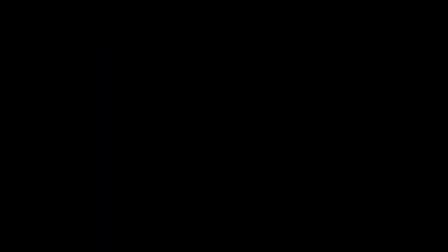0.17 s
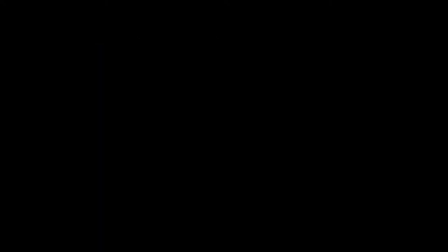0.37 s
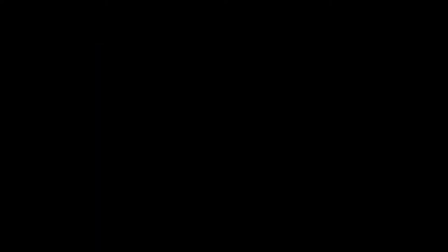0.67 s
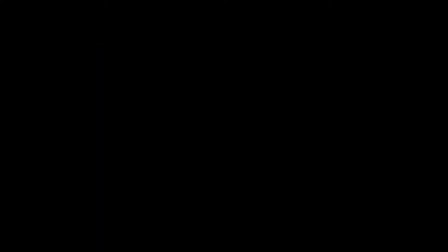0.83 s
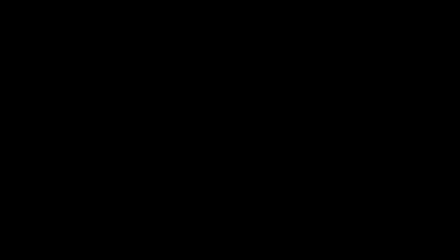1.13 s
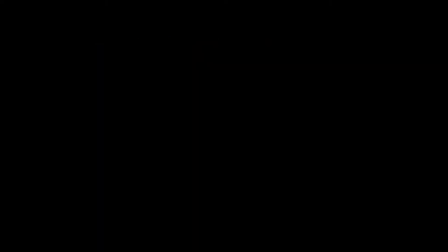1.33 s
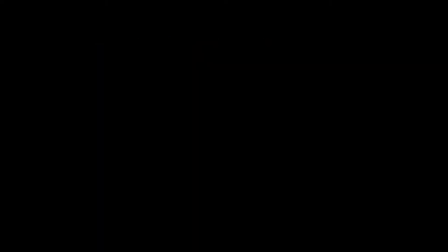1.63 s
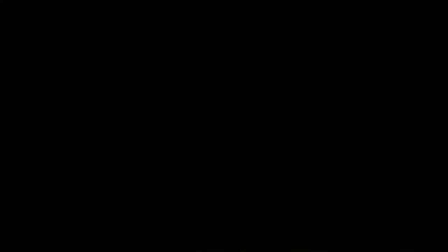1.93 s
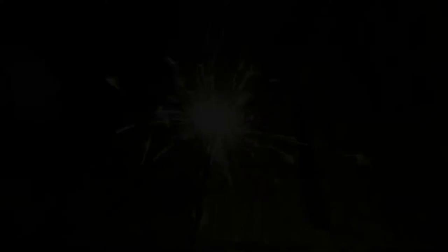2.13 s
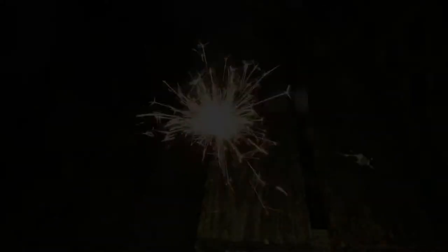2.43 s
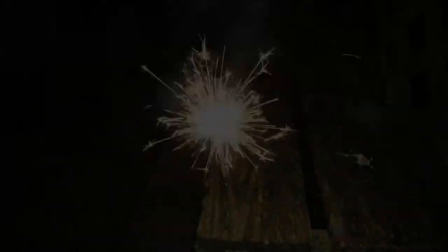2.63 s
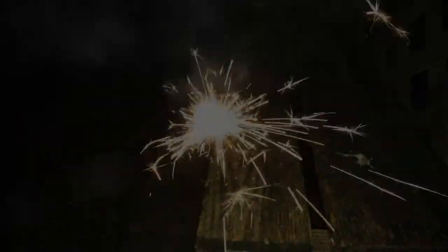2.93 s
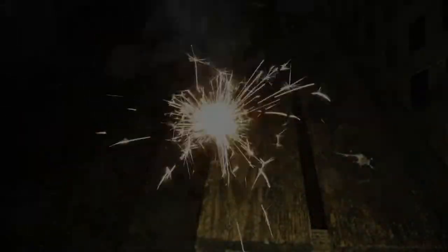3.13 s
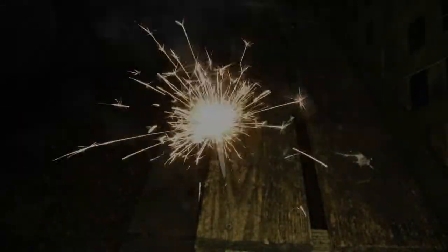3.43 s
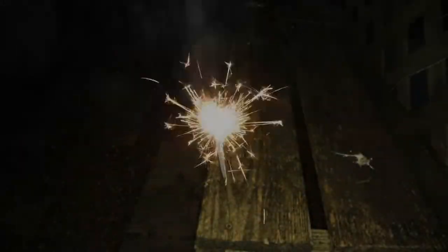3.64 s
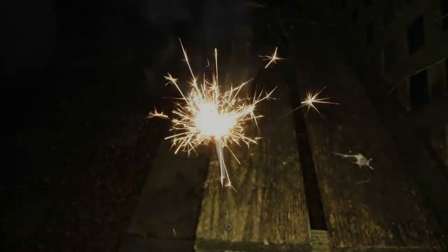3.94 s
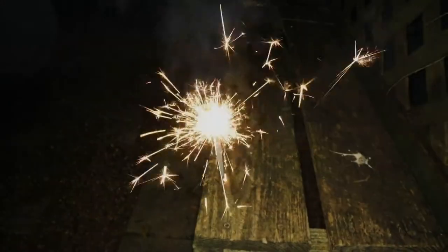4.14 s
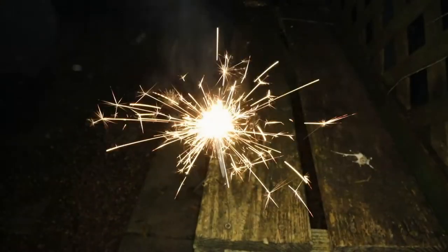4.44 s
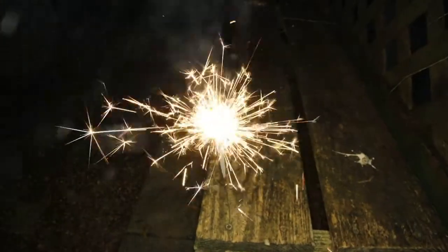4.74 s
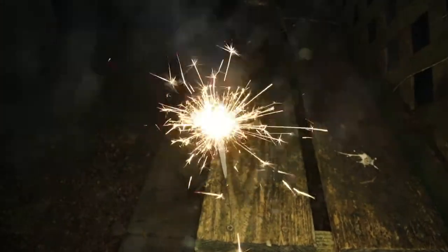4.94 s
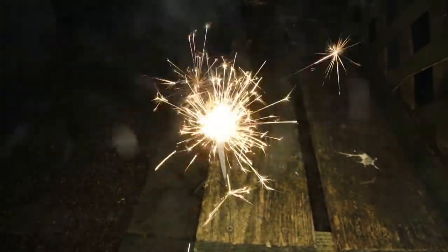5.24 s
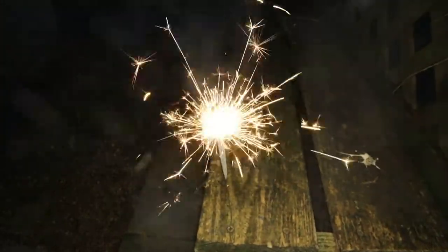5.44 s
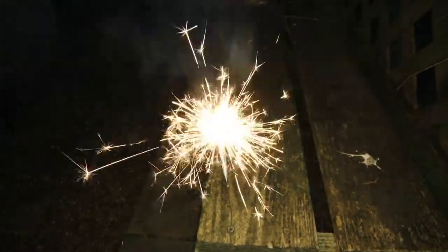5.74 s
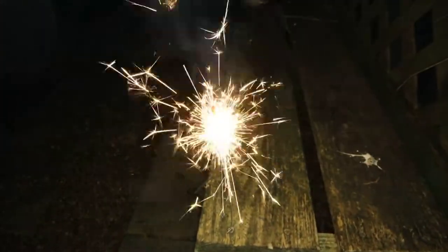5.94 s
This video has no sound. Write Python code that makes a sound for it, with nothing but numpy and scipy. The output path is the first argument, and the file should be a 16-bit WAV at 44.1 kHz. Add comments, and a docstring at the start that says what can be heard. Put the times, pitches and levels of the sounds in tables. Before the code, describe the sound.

A sparkler fizzes and crackles steadily close by while night insects trill and pulse high behind; a hard object knocks sharply on wooden boards and bounces.

```python
"""First heard, close to the microphone: a sparkler over wooden decking at night, a fizzing gas jet with dense
crackle and spark pops, made from shaped noise, random bursts and short tones.
Close by, a hard object knocks on the boards and bounces, then a few soft bumps: decaying board modes and noise.
Behind, insects trill in two high bands of wing tones and resonant noise; the upper chorus throbs mostly four
to five times a second, a nearer insect chirps in time, and a faint outdoor rumble of noise lies beneath."""
import sys
import numpy as np
from scipy import signal
from scipy.fft import rfft, irfft, next_fast_len
from scipy.io import wavfile

SR = 44100
rng = np.random.default_rng(int(sys.argv[2]) if len(sys.argv) > 2 else 0)


def persist_wave(psi):
    """Save psi, clipped to +-1, as 16-bit WAV."""
    counts = np.round(np.clip(psi, -1, 1) * 32767).astype(np.int16)
    wavfile.write(sys.argv[1], SR, np.atleast_2d(counts).T)


N = 268569
TIME = np.arange(N) / SR

# Vigour of the burn, scaled separately for fizz and rush: [t/s, relative level/dB]
BURN_VIGOUR = [(0, 0.6), (.42, -0.6), (.5, 1.8), (.98, -1.5), (1.12, 0.5), (1.7, 0.2), (1.9, 3),
               (2.2, -1.5), (2.62, 1), (3.08, -1.5), (3.36, 1.8), (3.99, -1.5), (4.07, 1.5), (4.34, -0.3),
               (4.95, 0.7), (5.04, -0.5), (5.6, 1.4), (6.09, .5)]
# Spectrum of the sparkler's bright fizz: [f/Hz, relative density/dB]
FIZZ_SPECTRUM = [(2500, -4), (4500, -29.5), (6000, -8), (8200, -4.5), (9500, 0.5), (10800, 1.5),
                 (12500, -2.5), (14000, -7), (15700, -13.5)]
# Spectrum of the gas jet's rush: [f/Hz, relative density/dB]
RUSH_SPECTRUM = [(300, -9), (560, 0), (750, 0.5), (1100, 0.5), (1600, 2), (2200, 0), (2700, -1),
                 (3700, -4.5), (4700, -7.5), (7000, -11)]
# Individual spark pops, levels before softening: [t/s, tick level/dB, tick f/Hz, snap level/dB]
SPARK_POPS = [(0.6691, -20, 1450, -45), (.7533, -24, 1900, -38), (0.7888, -24, 1390, -34),
              (1.5290, -30, 2130, -14), (1.6986, -27, 1790, -34), (4.0868, -17, 2580, -33),
              (4.1400, -21, 2330, -25), (4.9190, -17.5, 2570, -15), (5.4152, -29, 1800, -12.5),
              (5.4366, -35, 1800, -12)]
# Blows on the deck, levels before softening:
# [t/s, board level/dB, contact cut-off f/Hz, bass weight/dB, object f/Hz, object level/dB, crack level/dB]
DECK_KNOCKS = [(1.814, 1.5, 6000, 2.5, 1750, -1.5, -8.5), (1.8265, -9, 3000, 10, 1000, -24, -29),
               (1.857, -19, 3000, 11, 1500, -22, -34), (1.94, -19, 2500, 5, 1400, -31, -43),
               (1.9554, -3, 3200, -23, 1463, -4.5, -14), (1.9680, -12, 3000, -14, 1500, -25, -27),
               (2.0201, -11, 1790, -7, 1410, -17.5, -27), (2.101, -24, 160, 7, 900, -50, -60),
               (3.370, -15, 503, -16, 250, -20, -34), (4.0880, -27, 900, -11, 3950, -32, -52),
               (4.147, -29, 397, 4, 900, -50, -60), (5.7420, -34, 497, 4, 1200, -45, -60)]
# Ringing modes of the decking: [f/Hz, relative level/dB, 60 dB decay time/s]
BOARD_MODES = [(103.5, -25.5, 0.21), (118.6, -23, 0.2), (144, -15.5, 0.15), (162, -25, 0.29),
               (241, -25.5, 0.11), (276, -20, 0.19), (390, -16.5, 0.083), (516, -15, 0.083),
               (594, -10.5, 0.056), (710, -9.5, 0.042), (792, -11.5, 0.033), (981, -15.5, 0.068),
               (1313, -4, 0.015), (1410, -11, 0.024), (2120, -7, 0.012), (2370, -23.5, 0.051),
               (2670, -10.5, 0.013), (4120, -20, 0.0089), (4430, -27, 0.0042), (6170, -23, 0.013)]
# Spectrum of a knock's rumbling tail: [f/Hz, relative density/dB]
TAIL_SPECTRUM = [(60, -12), (90, 0), (170, 14.5), (300, 0), (600, 1.5), (1500, -0.5), (2500, -12),
                 (5000, -45), (12000, -31)]
# Beat shared by the high insects: [t/s, rate/beats per s]
INSECT_TEMPO = [(0, 4.7), (1.5, 4.75), (2.2, 5.1), (2.9, 4.55), (4.45, 4.55), (4.8, 3.2), (5.15, 4.35),
                (6.09, 4.35)]
# Depth of the chorus throb; negative values peak between beats: [t/s, swing level/dB]
CHORUS_THROB = [(0, 0.5), (.4, 2), (1.1, .6), (1.6, -1.2), (2.5, 2), (3.3, 0.3), (4.05, 2.5), (4.7, -0.5),
                (6.09, -0.8)]
# Nearer insect, level at the top of a chirp: [t/s, level/dB]
CHIRP_LEVEL = [(0, -45), (1.1, -46), (2.0, -48), (2.7, -46), (3.3, -45), (4.7, -49), (5.4, -42.5),
               (6.09, -41)]
# Low trilling crickets: [t/s, level/dB]
TRILL_LEVEL = [(0, -43), (.3, -39), (2.1, -38), (2.8, -39.5), (3.8, -40), (4.9, -38), (6.09, -40)]
# Spectrum of the outdoor rumble: [f/Hz, relative density/dB]
RUMBLE_SPECTRUM = [(25, -3), (50, -11), (80, -12), (110, -3), (150, -0.5), (200, -4), (270, 0.5),
                   (350, -10.5), (500, -3), (900, -42)]

FIZZ_DB, FIZZ_FOLLOWS = -41, 1.4  # level at zero vigour; dB per dB of vigour
RUSH_DB, RUSH_FOLLOWS = -42.5, 0.49
DECK_ECHO_S = .00195  # extra path of the sound that bounces off the boards
SNAP_HZ = 10500
SMALL_POP_DB, SMALL_POP_HZ, SMALL_SNAP_DB = -32, 2080, -31  # centres of the random ranges
CHORUS_DB, CHORUS_FIRST_BEAT_S = -33, 0.04
CHIRP_FIRST_BEAT_S, CHIRP_WIDTH_BEATS = .075, 0.22
DUCK_ABOVE_DB, DUCK_SHARE = -9.5, .3  # threshold; dB of ducking per dB above it
DUCK_ATTACK_S, DUCK_RELEASE_DB_PER_S = 0.013, 59
MIC_LOW_HZ, CUTOFF_HZ = 58, 15650


def from_db(db):
    """Decibels to gain."""
    return 10 ** (np.asarray(db) / 20)


def rms_one(x):
    """Scale to unit power."""
    return x / np.sqrt(np.mean(x ** 2) + 1e-20)


def in_time(rows):
    """A level or rate curve interpolated at every sample."""
    s, values = np.transpose(rows)
    return np.interp(TIME, s, values)


def drift(rate):
    """Random wander with a spread of one and the given number of knots per second."""
    knots = rng.standard_normal(4096)
    return rms_one(np.interp(TIME * rate, np.arange(len(knots)), knots))


def colour(x, spectrum):
    """Give a signal a smooth spectrum that falls away outside its ends; unit power."""
    hz, db = np.transpose(spectrum)
    size = next_fast_len(len(x))
    f = np.maximum(np.fft.rfftfreq(size, 1 / SR), 1)
    skirts = np.minimum(f / hz[0], 1) ** 2 * np.minimum(hz[-1] / f, 1) ** 2
    gain = skirts * from_db(np.interp(np.log(f), np.log(hz), db))
    return rms_one(irfft(rfft(x, size) * gain, size)[:len(x)])


def resonate(x, hz, width_hz):
    """A two-pole resonance with about unit gain at its top."""
    r = np.exp(-np.pi * width_hz / SR)
    zeros = [(1 - r * r) / 2, 0, (r * r - 1) / 2]
    poles = [1, -2 * r * np.cos(2 * np.pi * hz / SR), r * r]
    return signal.lfilter(zeros, poles, x + 1e-18)


def soften(x, cut_hz):
    """A gentle low-pass."""
    return signal.sosfilt(signal.butter(2, min(cut_hz, SR / 2 - 1), fs=SR, output="sos"), x)


def tone(hz, t):
    """A sine starting at zero phase."""
    return np.sin(2 * np.pi * hz * t)


def dying(t, t60):
    """Decay by 60 dB in t60 seconds."""
    return np.exp(-np.log(1000) * t / t60)


def add(out, s, sound):
    """Mix a sound in at time s."""
    at = round(s * SR)
    out[at:at + len(sound)] += sound[:N - at]


def sparkler():
    """Burning grains crackle over a jet of gas; both flare together as the coating burns unevenly."""
    vigour_db = in_time(BURN_VIGOUR)
    flare_db = 0.98 * drift(45) + .5 * drift(12)
    grains = crackle(per_s=4200, spread_db=3.8)
    fizz = colour(.56 * grains + .83 * rng.standard_normal(N), FIZZ_SPECTRUM)
    rush = colour(from_db(-9) * grains + rng.standard_normal(N), RUSH_SPECTRUM)
    # the deck echo ripples the spectrum
    echo = soften(np.roll(rush, round(DECK_ECHO_S * SR)), cut_hz=2100)
    rush = rush + 0.12 * echo
    fizz_gain = from_db(FIZZ_DB + FIZZ_FOLLOWS * vigour_db)
    rush_gain = from_db(RUSH_DB + RUSH_FOLLOWS * vigour_db)
    return from_db(flare_db) * (fizz_gain * fizz + rush_gain * rush)


def crackle(per_s, spread_db):
    """Random one-sample bursts of either sign, a few much larger than the rest; unit power."""
    sizes = from_db(spread_db * np.minimum(rng.exponential(1, N), 6))
    signs = rng.choice([-1, 1], N)
    return rms_one(sizes * signs * (rng.random(N) < per_s / SR))


def pops():
    """A large spark bursts: a very short bright snap, a two-toned tick and a brief puff."""
    out, t = np.zeros(N), TIME[:SR // 20]
    for s, db, hz, snap_db in list(SPARK_POPS) + small_pops(count=10, spread_db=7):
        puff = resonate(rng.standard_normal(len(t)), hz, width_hz=1200)
        puff = rms_one(resonate(puff, hz, width_hz=1200)) * dying(t, t60=.025)
        two_tones = tone(hz, t) - 0.58 * tone(1.52 * hz, t)
        tick = two_tones * (1 - np.exp(-hz * t)) * dying(t, t60=0.011)
        snap = tone(SNAP_HZ, t) * dying(t, t60=0.0012)
        body = soften(tick + 0.4 * puff, cut_hz=3200)
        add(out, s, from_db(db) * body + from_db(snap_db) * snap)
    return out


def small_pops(count, spread_db):
    """Faint pops at random moments, each with its own strength and pitch; columns as in SPARK_POPS."""
    rows = []
    for when, size, pitch, snap in rng.random((count, 4)):
        tick_db = SMALL_POP_DB + spread_db * (size - .5)
        tick_hz = SMALL_POP_HZ * 2 ** (pitch - .5)
        snap_db = SMALL_SNAP_DB + spread_db * (snap - .5)
        rows.append((when * TIME[-1], tick_db, tick_hz, snap_db))
    return rows


def knocks():
    """Each blow rings the boards and the hard object, with a contact crack and a tail spreading through the deck."""
    out, t = np.zeros(N), TIME[:SR // 2]
    for s, board_db, cut_hz, bass_db, ring_hz, ring_db, crack_db in DECK_KNOCKS:
        boards = np.zeros(len(t))
        for hz, db, t60 in BOARD_MODES:
            weight_db = bass_db / (1 + (hz / 200) ** 2)  # a heavier blow bends the whole board
            swell = 1 - np.exp(-3 * hz * t)  # each mode builds up over its first cycle
            boards += from_db(db + weight_db) * swell * tone(hz, t) * dying(t, t60)
        tail = from_db(-18.5) * colour(rng.standard_normal(len(t)), TAIL_SPECTRUM) * dying(t, t60=0.26)
        deck = soften(boards + tail, cut_hz)
        ring = tone(ring_hz, t) * dying(t, t60=0.022)
        crack_decay = dying(t, t60=0.0076) + 0.25 * dying(t, t60=0.2)
        crack = rng.standard_normal(len(t)) * crack_decay
        crack = soften(crack, cut_hz=2.4 * cut_hz)  # softer contacts crack less brightly
        add(out, s, from_db(board_db) * deck + from_db(ring_db) * ring + from_db(crack_db) * crack)
    return out


def insects():
    """A low trill and a throbbing high chorus; one nearer insect at its upper edge chirps on the same beat."""
    trill = from_db(-7.5) * wing(hz=3328, strokes_per_s=72.9, wander_hz=34.9, sweep_hz=160)
    trill += from_db(-3.5) * resonant_wings(hz=3278, width_hz=297, order=2)
    chorus = from_db(-10.5) * wing(hz=7246, strokes_per_s=120, wander_hz=60.44, sweep_hz=254)
    chorus += from_db(-0.5) * resonant_wings(hz=7182, width_hz=1090, order=5)
    throb_db = in_time(CHORUS_THROB) * np.cos(2 * np.pi * off_beat(CHORUS_FIRST_BEAT_S))
    chorus_db = CHORUS_DB + throb_db + 0.71 * drift(18)
    chirps = np.exp(-(off_beat(CHIRP_FIRST_BEAT_S) / CHIRP_WIDTH_BEATS) ** 2)
    chirper = chirps * resonant_wings(hz=7770, width_hz=100, order=3)
    background = from_db(in_time(TRILL_LEVEL)) * trill + from_db(chorus_db) * chorus
    return background + from_db(in_time(CHIRP_LEVEL)) * chirper


def wing(hz, strokes_per_s, wander_hz, sweep_hz):
    """One insect: every wing stroke is a short tone that falls in pitch and starts at a new phase."""
    turns = np.cumsum(strokes_per_s * (1 + .012 * drift(6))) / SR + rng.random()
    stroke, part = turns.astype(int) % 2048, turns % 1
    start = rng.random(2048)[stroke]
    pitch = hz + wander_hz * drift(60) + sweep_hz * (.5 - part)
    cycles = np.cumsum(pitch) / SR + start
    return rms_one(np.sin(np.pi * part) ** 2 * np.sin(2 * np.pi * cycles))


def resonant_wings(hz, width_hz, order):
    """Noise through repeated wing resonances: merged distant strokes, or a single singer when narrow."""
    x = rng.standard_normal(N)
    for _ in range(order):
        x = resonate(x, hz, width_hz)
    return rms_one(x)


def off_beat(first_beat_s):
    """Signed distance from the nearest beat of the insects, in beats."""
    per_s = in_time(INSECT_TEMPO)
    beats = np.cumsum(per_s) / SR - first_beat_s * per_s[0]
    return (beats + .5) % 1 - .5


def night_air():
    """A faint, stirring outdoor rumble of low-coloured noise."""
    return from_db(-53.5 + 1.9 * drift(8)) * colour(rng.standard_normal(N), RUMBLE_SPECTRUM)


def scene():
    """Sparkler and knocks close by, insects and night air behind."""
    return (sparkler() + pops() + knocks() + insects() + night_air())[None]


def gain_control(x):
    """The recorder's gain control: a loud peak turns the gain down, and it recovers at a steady rate."""
    over_db = DUCK_SHARE * np.maximum(20 * np.log10(np.abs(x) + 1e-9) - DUCK_ABOVE_DB, 0)
    release_db = DUCK_RELEASE_DB_PER_S * TIME
    held_db = np.maximum.accumulate(over_db + release_db, axis=-1) - release_db
    r = np.exp(-1 / (DUCK_ATTACK_S * SR))
    return x * from_db(-signal.lfilter([1 - r], [1, -r], held_db))


def record(dry):
    """Peaks duck the gain, then clip if too loud; a small microphone drops deep bass; the top is cut steeply."""
    clipped = np.clip(gain_control(dry), -.9, .9)
    thin = signal.sosfilt(signal.butter(3, MIC_LOW_HZ, "high", fs=SR, output="sos"), clipped)
    return signal.sosfilt(signal.ellip(12, .1, 90, CUTOFF_HZ, fs=SR, output="sos"), thin)


dry = scene()
out = record(dry)
persist_wave(out)
```